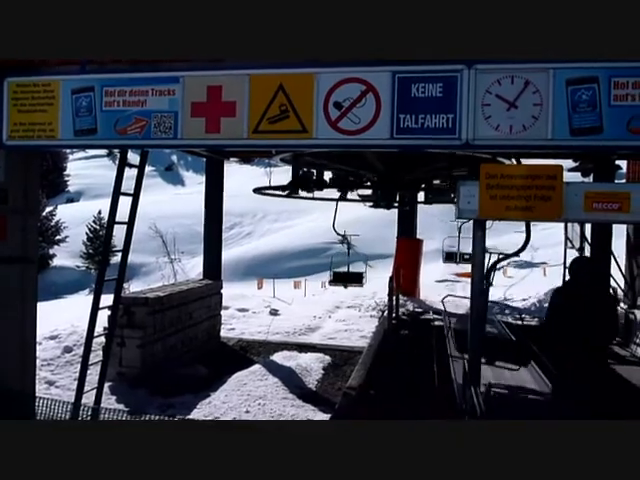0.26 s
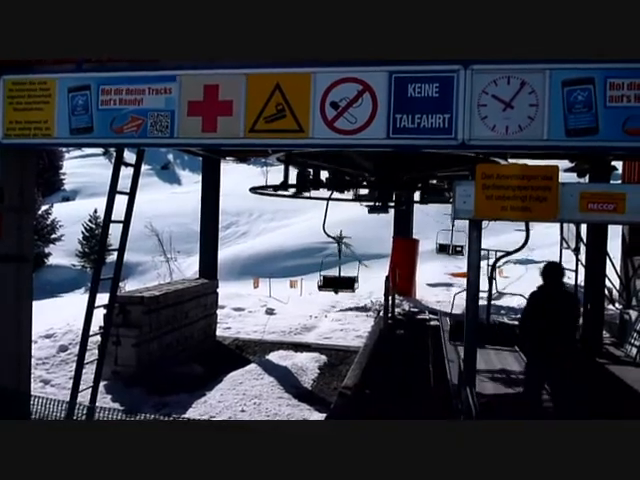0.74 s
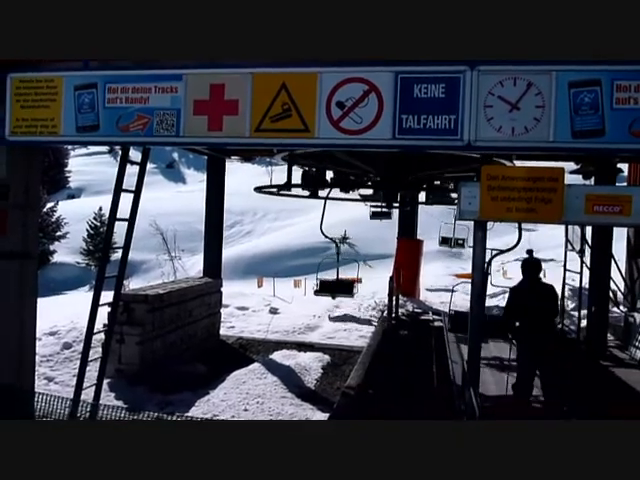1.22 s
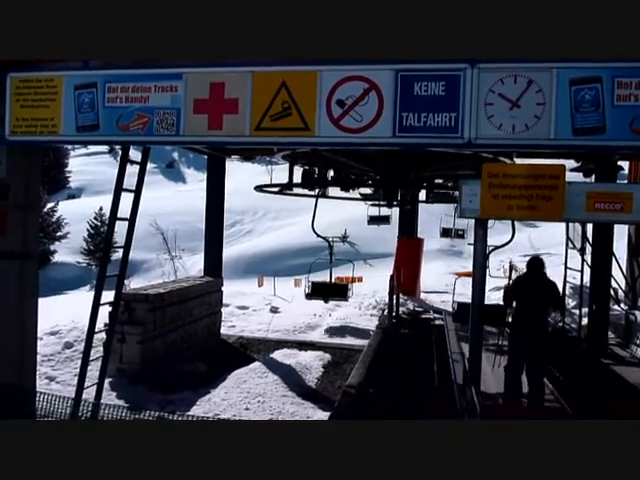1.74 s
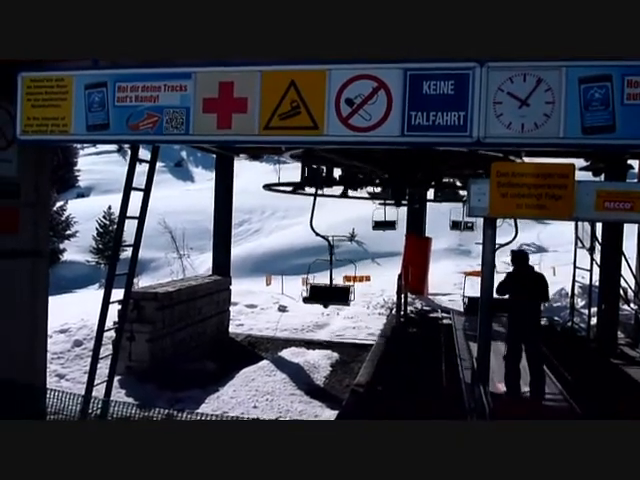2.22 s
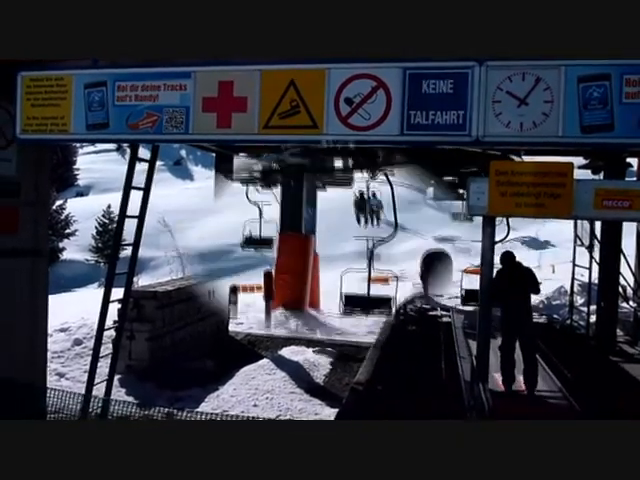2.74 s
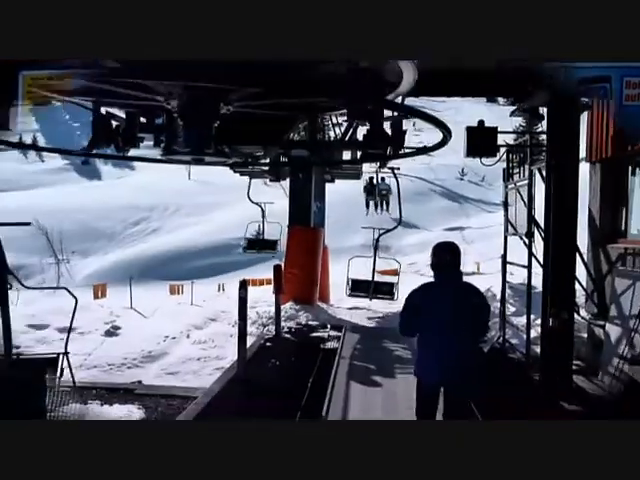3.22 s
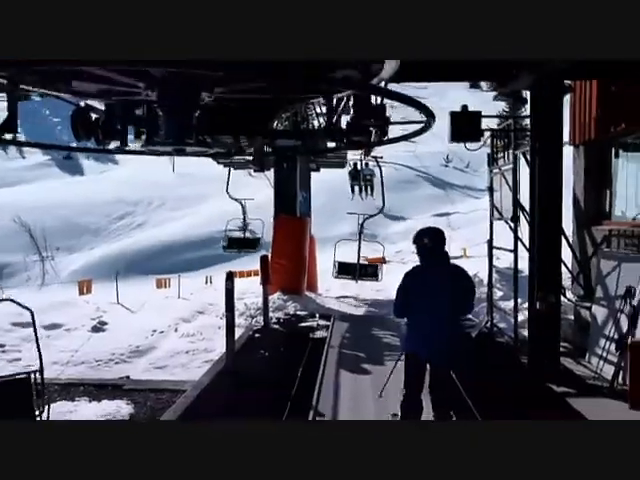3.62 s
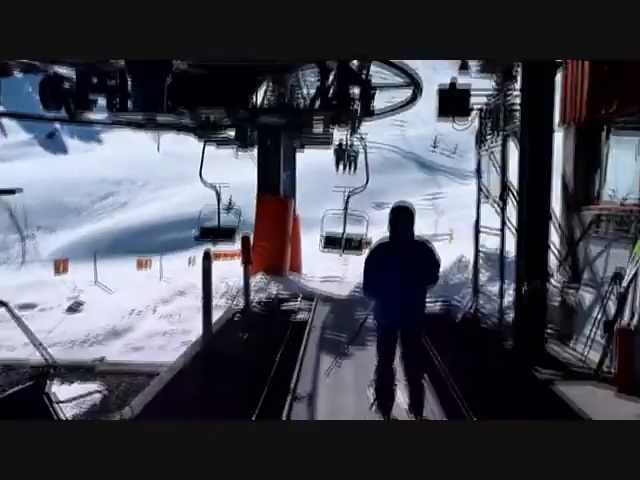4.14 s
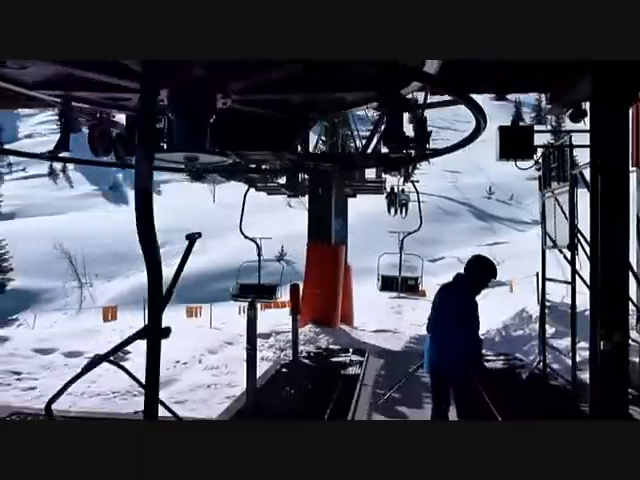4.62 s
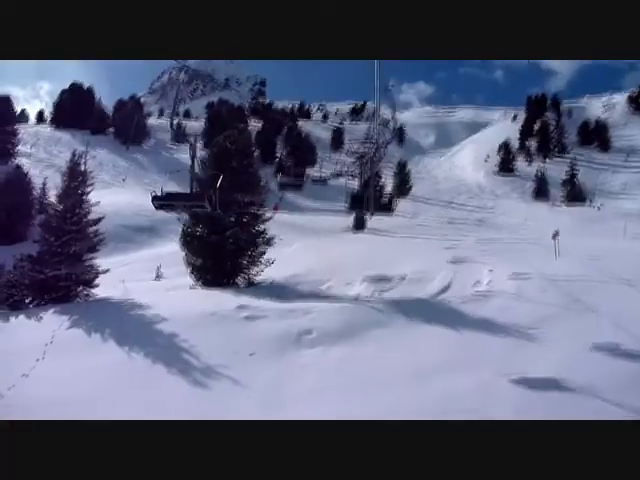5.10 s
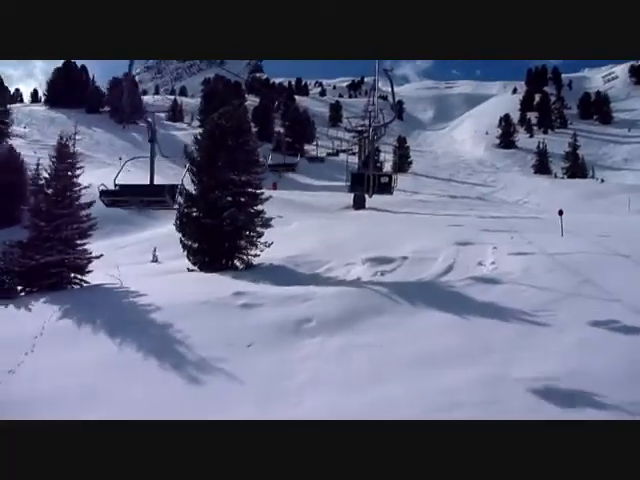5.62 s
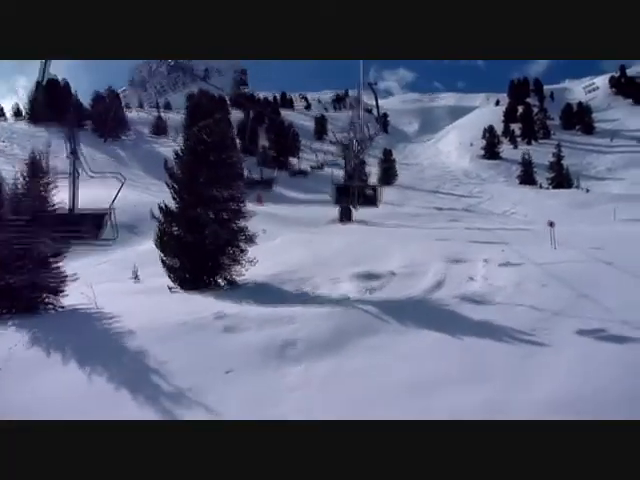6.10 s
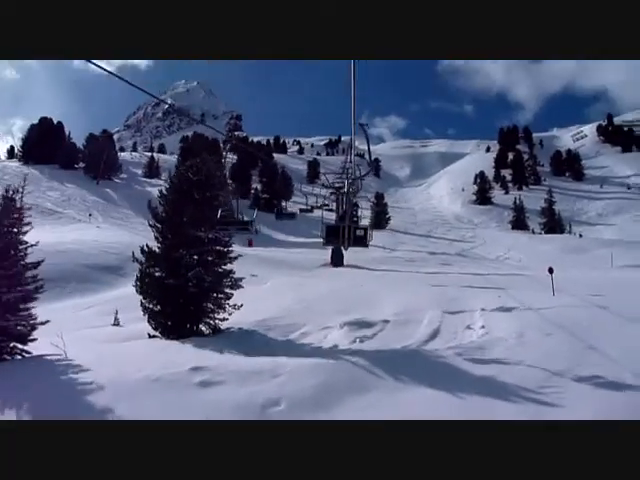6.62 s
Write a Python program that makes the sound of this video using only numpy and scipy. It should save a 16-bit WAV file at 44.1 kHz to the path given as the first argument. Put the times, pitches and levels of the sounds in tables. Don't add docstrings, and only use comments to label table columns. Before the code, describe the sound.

For the first five seconds a chairlift drive station runs steadily: a fluttering mid-pitched gear whine with overtones, fan and electrical hum, a ringing wheel and broad roar. At 1.0-1.5 s skis scrape in a grainy hiss; at 1.9 s two bright pole clicks snap close together. From 2.8 to 3.4 s the sound crossfades to a position under the wheel, changing tone and becoming closer and fuller by 4 s, with a low roller groan. A hard metallic clack with rattling follows at 4.2 s. At about 4.96 s it cuts with a click, a tiny gap, then a far quieter slope: soft wind, faint rope hum and distant whine, cloth rustle, tiny ticks. A loose bar knocks lightly at 5.6 and 5.9 s, then louder with bounces at 6.2, 6.5 and 6.8 s. The small microphone gives a dull top and thin bass.

```python
import sys
import numpy as np
from scipy import signal
from scipy.fft import rfft, irfft, next_fast_len
from scipy.io import wavfile
from scipy.ndimage import uniform_filter1d

SR = 44100
rng = np.random.default_rng(int(sys.argv[2]) if len(sys.argv) > 2 else 0)


def unload_wav(signal):
    wavfile.write(
        sys.argv[1],
        SR,
        np.round(np.clip(np.atleast_2d(signal).T, -1, 1) * 32767).astype(np.int16),
    )


def level_to_linear(level):
    exponent = np.asarray(level, float) / 20
    return 10 ** exponent


N = 302526
T = np.arange(N) / SR
MESH_HZ = 677.3
CUT_S, TAIL_S, START_S = 4.9587, 4.984, 4.9972
BLOW_S = .08

# f/Hz, level/dB per Hz
SLIDE_SPECTRUM = [(500, -30), (900, -4), (1600, 0), (2500, 0.5), (3300, 2), (4500, 0), (5500, -4.5),
                  (6800, -10.5), (8000, -24.5), (10000, -68.5)]


def unit(x):
    return x / np.sqrt(np.mean(x ** 2))


def walk(rate_hz):
    k = 8
    steps = np.repeat(rng.standard_normal(int(T[-1] * rate_hz) + 2), k)
    smooth = unit(uniform_filter1d(uniform_filter1d(steps, k), k))
    return np.interp(T * rate_hz * k, np.arange(len(smooth)), smooth)


def swells(rows):
    total = 0
    for s, rise_s, fall_s, height in rows:
        times = s - max(rise_s, .005), s, s + max(fall_s, .005)
        total = total + height * np.sin(np.pi / 2 * np.interp(T, times, (0, 1, 0))) ** 2
    return total


def shifts(rows, order):
    return swells([(s, half_s, half_s, db) for s, half_s, m, db in rows if round(m) == order])


def colour(x, points, flicker_db, rate_hz):
    size = next_fast_len(N, True)
    octave = np.log2(np.fft.rfftfreq(size, 1 / SR) + 1)
    hz, db = np.array(points).T
    spec = rfft(x, size) * level_to_linear(np.interp(octave, np.log2(hz), db))
    total = 0
    for centre in range(4, 15):
        band = irfft(spec * np.clip(1 - abs(octave - centre), 0, 1), size)[:N]
        total = total + band * level_to_linear(flicker_db * walk(rate_hz))
    return unit(total)


def tones(lines, fading_db, rate_hz):
    total = 0
    for (hz, db, *start), turn in zip(lines, rng.random(len(lines))):
        level = 2 ** .5 * level_to_linear(db + fading_db * walk(rate_hz))
        total = total + level * np.sin(2 * np.pi * (hz * T + (start or [turn])[0]))
    return total


def ring(hz, t60_s):
    t = T[:int(SR * BLOW_S)]
    return np.sin(2 * np.pi * hz * t) * 1000. ** (-t / t60_s)


def crack(lo_hz, hi_hz, t60_s):
    t = T[:int(SR * BLOW_S)]
    band = signal.butter(2, [lo_hz, min(hi_hz, .4 * SR)], "band", fs=SR, output="sos")
    noise = unit(signal.sosfilt(band, rng.standard_normal(len(t))))
    return 0.39 * noise * 1000. ** (-t / max(t60_s, .003)) * (1 - t / t[-1])


def add(out, s, sound):
    i = int(s * SR)
    out[i:i + len(sound)] += sound[:N - i]


def clicks(rows):
    out = np.zeros(N)
    for s, db, hz, t60_s, octaves in rows:
        wide = 2 ** np.clip(octaves, .05, 2)
        blow = .5 * ring(hz, max(t60_s, .003)) + crack(hz / wide, hz * wide, t60_s)
        add(out, s + 0.00061, level_to_linear(db) * blow)
    return out


def gears(near, close_db):
    far_db, near_db = (-35, -37, -33.5, -55), (-41, -40.5, -37.5, -53)
    flutter_db, flutter_hz = (0.4, 0.7, 1.0, 1.0), (14, 18, 22, 12)
    wander_rad, jitter_rad, rough_db = .2, .07, .45
    # beat f/Hz, share, start/rad
    beats = [(3.3, 0.12, 3.55), (2.5, 0.07, 0.34), (5.5, 0.13, 3.1), (4.4, 0.39, 0.59)]
    # t/s, rise/s, fall/s, shift/Hz
    loads = [
        (0.42, 0.12, 0.13, 1.07),
        (1.25, 0.218, 0.213, -3),
    ]
    # t/s, half length/s, multiple, level/dB
    multiple_shifts = [(0.312, 0.098, 1, 4), (0.448, 0.088, 1, -4.5), (0.982, 0.099, 1, 4.5), (1.13, 0.17, 1, -2),
                       (2.367, 0.12, 1, -5.5), (3.117, 0.61, 1, -9), (3.465, 0.083, 1, 6), (3.697, 0.17, 1, -1.5),
                       (4.03, 0.23, 1, 2), (4.217, 0.038, 1, -27), (4.452, 0.15, 1, -16), (4.758, 0.21, 1, 3),
                       (0.443, 0.047, 2, 3.5), (0.876, 0.1, 2, -5), (1.247, 0.17, 2, -5.5), (2.998, 0.11, 2, -14),
                       (3.314, 0.28, 2, 4.5), (3.77, 0.075, 2, -13), (3.95, 0.077, 2, 6.5), (4.213, 0.32, 2, -6.5),
                       (4.683, 0.16, 2, -12.5), (0.205, 0.15, 3, -5.5), (1.788, 0.094, 3, 4.5),
                       (1.064, 0.081, 3, 5.5), (2.647, 0.11, 3, -12), (3.033, 0.31, 3, -5.5), (3.696, 0.039, 3, 9),
                       (4.265, 0.055, 3, -29), (4.787, 0.18, 3, 4), (4.033, 0.036, 4, 8), (.6, .1, 1, 2),
                       (1.11, .05, 1, -3), (1.8, .1, 1, 3), (3.65, .05, 1, -4), (4.9, .05, 1, -4),
                       (2.52, .08, 1, -3), (4.87, .07, 2, 4), (1.07, .1, 3, 2), (1.47, .12, 3, -3),
                       (4.17, .08, 2, -3), (1.55, .08, 2, -4), (1.65, .03, 2, -7), (4.04, .06, 2, 5),
                       (4.42, .08, 2, -5), (.24, .03, 3, -6), (1.93, .03, 3, -5), (2.3, .15, 3, 1.5),
                       (2.72, .04, 3, 2), (2.93, .06, 3, 4), (3.8, .07, 3, 5), (3.39, .03, 3, -5),
                       (1.087, 0.033, 1, -7.0), (1.197, 0.12, 1, 3.5), (1.696, 0.068, 1, -3.5),
                 (2.877, 0.11, 1, 3), (3.367, 0.047, 1, -10), (3.587, 0.085, 1, -2), (3.697, 0.04, 1, 2),
                 (3.741, 0.049, 1, -11), (3.78, 0.031, 1, 2), (3.87, 0.048, 1, 4.5), (3.958, 0.075, 1, 0),
                 (4.055, 0.088, 1, 3.5), (4.37, 0.055, 1, -9), (4.704, 0.072, 1, -1), (0.176, 0.036, 2, -8),
                 (0.28, 0.055, 2, -4), (0.913, 0.085, 2, 2.5), (1.053, 0.051, 2, 5), (1.187, 0.036, 2, 2),
                 (1.236, 0.04, 2, 7), (1.742, 0.14, 2, 2), (2.138, 0.082, 2, -2.5), (2.265, 0.088, 2, 1),
                 (2.803, 0.064, 2, -7), (3.036, 0.04, 2, 5), (3.088, 0.053, 2, -7), (3.593, 0.091, 2, 5),
                 (3.722, 0.062, 2, -2), (4.769, 0.04, 2, -6), (0.71, 0.12, 3, -5.5), (0.826, 0.033, 3, 2),
                 (1.426, 0.33, 3, 0), (1.616, 0.12, 3, 3), (1.701, 0.078, 3, -5), (1.97, 0.13, 3, -5.5),
                 (2.21, 0.039, 3, 2), (2.42, 0.039, 3, -9), (2.722, 0.029, 3, 4), (2.844, 0.057, 3, 3),
                 (3.06, 0.03, 3, 5), (3.12, 0.065, 3, -8), (3.426, 0.12, 3, -5), (3.933, 0.12, 3, 1.5),
                 (4.07, 0.13, 3, -10), (4.397, 0.041, 3, -14), (4.486, 0.046, 3, 7), (4.563, 0.04, 3, 2.5),
                 (4.604, 0.04, 3, -11), (4.768, 0.055, 3, -1.5)]
    levels_db = []
    for i, (beat_hz, share, start_rad) in enumerate(beats):
        db = far_db[i] + (near_db[i] - far_db[i]) * near + close_db
        db = db + flutter_db[i] * walk(flutter_hz[i]) + shifts(multiple_shifts, i + 1)
        beat_rad = 2 * np.pi * beat_hz * T + start_rad + .3 * walk(5.4)
        levels_db.append(db + 20 * np.log10(abs(1 + np.clip(share, 0, .8) * np.exp(1j * beat_rad))))
    turn_rad = 2 * np.pi * (MESH_HZ * T + np.cumsum(swells(loads)) / SR) + wander_rad * walk(8)
    rough = 1 + 1.3 * near
    whine = level_to_linear(levels_db[3] - 3.5) * np.sin(5 * turn_rad)
    for k, db in enumerate(levels_db, 1):
        level = level_to_linear(db + 2.0 + rough * k * rough_db * walk(45))
        whine = whine + level * np.sin(k * turn_rad + rough * k * jitter_rad * walk(35))
    return 2 ** .5 * whine


def fan(near):
    # order, level/dB
    far_orders = [(5, -50.5), (6, -54), (8, -39.5), (9, -42), (10, -40), (11, -47), (4, -57)]
    near_orders = [(5, -43), (6, -52), (8, -39), (9, -56), (10, -37.5), (11, -56.5), (4, -51)]
    # t/s, half length/s, order, level/dB
    order_shifts = [(0.3, 0.29, 8, 3.5), (.75, 0.15, 8, 5), (.1, 0.27, 10, 1.5), (0.97, .25, 9, 4.5),
                    (3.27, .2, 8, -9), (2.9, .2, 8, 4), (3.75, 0.49, 8, 7), (5, .25, 8, -5.5),
                    (3.85, 0.35, 10, -13), (4.4, .3, 10, 4.5), (4.1, 0.087, 10, -8.5), (4.55, 0.45, 9, 7),
                    (0.68, 0.43, 5, 5.5), (4.9, 0.16, 5, 8.5), (4.4, 0.11, 11, 9.5), (1.8, .12, 11, -9),
                    (3, .3, 11, -8), (4.66, .18, 9, 9), (2.4, .1, 9, 6), (3.48, .2, 10, 3.5)]
    fan_hz = 45.45

    def blades(orders):
        lines = [(k * fan_hz, db + shifts(order_shifts, k), k % 2 / 4) for k, db in orders]
        return unit(tones(lines, .8, 7))

    mix = level_to_linear(-34.5) * (1 - near) * blades(far_orders) + level_to_linear(-39.5) * near * blades(near_orders)
    return level_to_linear(-1.5 * near) * mix


def mains(near, close_db):
    mains_hz = 300.2
    hum = tones([(mains_hz, -46.5), (3 * mains_hz, -58), (703.5, -50)], 1.5, 5.2)
    second_db = -19 + swells([(3.1, .35, .08, 12), (5.6, 0.17, .1, 10), (3.6, 0.39, .15, -15), (3.7, .1, .1, 5)])
    casing = tones([(2 * mains_hz, second_db), (4 * mains_hz, -26)], 1.5, 5.9)
    return level_to_linear(-4 * near) * hum + near * level_to_linear(-32.5 + close_db) * casing


def pump(near):
    return level_to_linear(-5 * near) * tones([(371.87, -47, .17)], 0.62, 3.4)


def wheel(near, close_db):
    # f/Hz, level/dB
    far_lines = [(1408, -55), (1430, -54), (1452, -55), (1475, -52), (1497, -54), (1518, -48), (1561, -57),
                 (1583, -55), (1604, -51), (1647, -50), (1712, -50), (1782, -51), (1803, -46), (1825, -45),
                 (1846, -54), (1868, -55), (1911, -54), (1933, -54), (1999, -51), (2065, -52), (2086, -53)]
    near_lines = [(1408, -61), (1432, -51), (1453, -47), (1475, -56), (1518, -54), (1540, -49), (1561, -54),
                  (1583, -52), (1604, -52), (1626, -52), (1650, -57), (1674, -52), (1690, -49), (1712, -53),
                  (1739, -52), (1758, -52), (1782, -49), (1803, -56), (1825, -55), (1846, -49), (1868, -55),
                  (1890, -56), (1911, -55), (1933, -54), (1955, -53), (1976, -50), (1999, -50), (2065, -51),
                  (2086, -49), (2108, -58), (2129, -57)]
    shaft_hz = MESH_HZ / 62

    def odd_orders(lines):
        return [(shaft_hz * (2 * np.round((hz / shaft_hz - 1) / 2) + 1), db) for hz, db in lines]

    far = level_to_linear(-0.17) * tones(odd_orders(far_lines), 2, 4)
    under = level_to_linear(-1.0) * tones(odd_orders(near_lines), 2.8, 4.5)
    band = signal.butter(3, [1380, 2120], "band", fs=SR, output="sos")
    hiss = unit(signal.sosfilt(band, rng.standard_normal(N)))
    return level_to_linear(close_db) * (far * (1 - near) + under * near + level_to_linear(-43.5) * hiss)


def roar(close_db, slide_db):
    # f/Hz, level/dB per Hz
    roar_spectrum = [(150, -36), (220, -5.5), (450, 0.5), (700, -2.5), (1000, -8), (1500, -8),
                     (2200, -11.5), (3500, -13.5), (5300, -16), (6800, -26.5), (8000, -35.5),
                     (10000, -82.5)]
    # peak/s, rise/s, fall/s, level/dB
    rushes = [
        (0.59, 0.048, .05, 3.5),
        (1.04, 0.13, 0.19, 5),
        (1.3, 0.44, .3, -1.5),
        (4.29, 0.067, .05, 4.5),
        (4.39, 0.05, 0.055, 4.5),
        (.87, 0.059, .06, -3.5),
        (2.85, 0.22, 0.32, -2),
        (3.8, 0.33, .3, -1.5),
    ]
    level_db = -36.5 + 0.59 * close_db + 0.16 * slide_db + swells(rushes)
    return level_to_linear(level_db) * colour(rng.standard_normal(N), roar_spectrum, 1.0, 9)


def rumble(near):
    # f/Hz, level/dB per Hz
    rumble_spectrum = [(18, -82), (30, -50), (75, -46), (108, -19 ), (140, -9), (216, -4.5), (240, -16),
                       (310, -33), (530, -120)]
    level_db = -59 - 11 * near * (1 - near) - 0.67 * near
    noise = colour(rng.standard_normal(N), rumble_spectrum, 0.47, 16)
    shafts = tones([(90.9, -14.5), (118.65, 2.5 - 5 * near)], .5, 1.1)
    return level_to_linear(level_db) * (level_to_linear(10.0) * noise + shafts)


def skis(slide_db):
    grains = rng.standard_normal(N) * level_to_linear(1.2 * walk(600))
    return level_to_linear(-43.5 + slide_db) * colour(grains, SLIDE_SPECTRUM, .8, 14)


def poles_and_grip():
    # t/s, peak level/dB, centre f/Hz, t60/s, half width/octaves
    pole_clicks = [(.57, -25.5, 4050, .015, 0.86), (1.873, -26, 4600, 0.015, 0.52),
                   (1.8872, -13, 6100, 0.0062, 0.08), (1.8877, -14, 4440, 0.0096, 0.078),
                   (1.8876, -17, 3470, 0.009, .12), (1.9333, -13, 6200, 0.005, 0.25),
                   (1.9332, -15, 4560, .007, 0.21), (1.9333, -14, 3300, 0.0077, 0.3),
                   (3.169, -26, 3280, .015, 0.85), (3.4275, -32.5, 7350, .012, .1),
                   (3.4293, -24, 5000, .01, .2), (1.913, -33, 4960, .02, .3),
                   (1.919, -31, 5030, 0.056, 0.39), (1.925, -29, 5600, 0.046, 0.41),
                   (4.2048, -10, 2880, .015, .2), (4.2055, -21, 4340, .07, 0.1),
                   (4.2108, -21, 4700, .04, 0.15), (4.2167, -21, 4900, .03, 0.12),
                   (4.2266, -20, 3180, 0.027, 0.15), (4.2335, -20, 4340, 0.06, 0.15),
                   (4.253, -27, 4500, .04, .2), (4.273, -34, 4300, .03, 0.19),
                   (4.3006, -21, 3260, 0.037, .4), (4.312, -31, 4330, .05, 0.15),
                   (4.321, -21, 3400, .02, .3), (4.28, -27, 348, 0.27, 0.092), (4.2795, -15, 2100, .03, .2)]
    out = clicks(pole_clicks)
    add(out, 4.2052, level_to_linear(-19.5) * crack(2700, 5300, .4))
    return out


def roller(near):
    # peak/s, rise/s, fall/s, level/dB
    groans = [
        (3.42, .25, 0.42, 11.5),
        (3.9, 0.63, 0.55, 19.5),
        (4.4, 0.099, 0.086, 17.5),
        (4.67, 0.18, 0.14, 13.5),
    ]
    return np.sqrt(near) * level_to_linear(-54 + swells(groans)) * tones([(323.4, 0)], .8, 9)


def station():
    # t/s, level/dB
    closeness = [(0.0, 1), (1.0, 0.5), (1.6, -0.8), (2.6, 0.5), (2.95, -1), (3.3, 1.8), (3.65, 3),
                 (3.95, 7.5), (4.3, 7), (4.55, 6), (4.96, 5)]
    # peak/s, rise/s, fall/s, level/dB
    pushes = [(0.95, .5, 0.091, 2.5), (1.04, 0.13, 0.24, 8.5), (1.18, 0.085, 0.25, 13),
              (1.42, 0.28, 0.26, 13), (1.9, 0.18, 0.11, 3), (2.75, .1, 0.14, 4), (3.82, 0.25, 0.58, 8),
              (3.76, .04, 0.06, 2.5), (3.99, .1, .08, 4), (1.24, 0.042, 0.074, 2.5),
              (4.68, .15, 0.066, 3.5)]
    near = np.interp(T, (2.8, 3.44), (0, 1))
    close_db = np.interp(T, *np.transpose(closeness))
    slide_db = swells(pushes)
    drive = gears(near, close_db - .25 * slide_db)
    drive = drive + fan(near) + mains(near, close_db) + pump(near) + wheel(near, close_db)
    drive = drive + roar(close_db, slide_db) + rumble(near) + roller(near)
    return drive + skis(slide_db) + poles_and_grip()


def mountain_air():
    # f/Hz, level/dB per Hz
    air_spectrum = [(18, -83), (30, -53), (150, -6), (199, -11), (290, -6), (333, -11), (507, -10),
                    (889, -13.5), (976, -15), (1390, -16), (1520, -20), (2060, -19), (8000, -35),
                    (10400, -82), (17600, -120)]
    return level_to_linear(-45.5 - 0.7 * (T - START_S)) * colour(rng.standard_normal(N), air_spectrum, 0.72, 21)


def rope():
    # peak/s, rise/s, fall/s, level/dB
    hum_swells = [
        (5.52, 0.2, 0.3, 13),
        (4.6, .1, .15, 11),
        (6.5, .25, .2, 12),
        (6.6, .35, .5, -10),
    ]
    whine_swells = [
        (5.35, .25, .1, 1),
        (5.58, 0.16, 0.12, -11),
        (6.0, 0.28, 0.46, 5),
    ]
    far_mesh_hz = 674.8
    hum = level_to_linear(-62.5 + swells(hum_swells)) * tones([(149.7, -2.5)], 1.4, 8) + tones([(90.2, -67.0)], 0.89, 4)
    lines = [(far_mesh_hz, -5), (2 * far_mesh_hz, -.5), (3 * far_mesh_hz, -9)]
    return hum + level_to_linear(-58 + swells(whine_swells)) * tones(lines, 1.5, 8)


def rustle():
    # peak/s, rise/s, fall/s, level/dB
    rubs = [
        (5.0, 0.0092, .02, 6),
        (4.7, .015, .025, 6),
        (5.41, .015, .03, 3),
        (5.3, .04, 0.036, 1.5),
        (5.66, .03, 0.03, 4.5),
        (5.5, .1, 0.055, -2),
        (6.07, 0.064, 0.049, 6.5),
        (6.6, 0.076, 0.23, -8),
    ]
    grains = rng.standard_normal(N) * level_to_linear(2.6 * walk(150))
    return level_to_linear(-53 + swells(rubs)) * colour(grains, SLIDE_SPECTRUM, 1.3, 20)


def chair_ticks():
    # t/s, peak level/dB, centre f/Hz
    ticks = [(5.1108, -37, 2650), (5.16, -46, 3820), (5.2056, -42, 3670), (5.227, -37, 2200),
             (5.2644, -43, 2490), (5.3774, -40, 2360), (5.404, -41, 2320), (5.469, -38, 2140),
             (5.537, -41, 2000), (5.542, -33, 2100), (5.546, -43, 2250), (5.553, -40, 2150),
             (5.558, -41, 2060), (5.579, -44, 2000), (5.6471, -42, 4250), (5.655, -42, 4300),
             (5.668, -46, 3460), (6.0337, -39, 2230), (6.0526, -43, 4420), (6.0713, -43, 2360),
             (6.189, -37, 2200), (6.2704, -41, 2170), (6.365, -35, 2980), (6.4154, -45, 2110),
             (6.4313, -38, 2260), (6.537, -40, 4400),
             (5.0044, -48, 3910), (5.0932, -51, 3900), (5.1111, -39, 4380), (5.128, -38, 2200),
                 (5.176, -52, 3900), (5.2269, -41, 4340), (5.242, -47.5, 4400), (5.294, -44, 3300),
                 (5.365, -48, 4090), (5.4045, -45, 5040), (5.415, -47, 4300), (5.5237, -50, 3450),
                 (6.0336, -44, 4270), (6.072, -45, 4100), (6.1877, -43, 4460), (6.4297, -47, 4550),
                 (6.6432, -49, 3990)]
    t60_s, octaves = 0.046, 0.17
    snap = 5.7132, -21, 5600, .007, .18
    return clicks([(*tick, t60_s, octaves) for tick in ticks] + [snap])


def bar():
    # t/s, peak level/dB, low modes/dB
    knocks = [(5.6153, -21.5, -12), (5.6294, -39, -6), (5.8833, -17, -16), (5.9001, -20, -8),
              (5.9084, -29, -13), (6.2139, -8.5, -14), (6.2254, -11.5, -16), (6.234, -30, -17),
              (6.4852, -10, -15), (6.4967, -13.5, -18), (6.7724, -10.5, -19), (6.781, -33.5, -25),
              (6.7841, -10, -29), (6.7924, -30, -21)]
    # f/Hz, level/dB, t60/s
    bar_modes = [(1020, -27, 0.034), (1290, -11, 0.064), (1640, -4.5, 0.063), (2310, -2, 0.044),
                 (3400, -19, .025), (4300, 9, 0.11), (5100, -6, 0.018), (5080, 2.5, 0.043),
                 (5500, -16, 0.023), (5900, -15, .02), (6320, -26, 0.015), (7360, -17, .02)]
    free_s, settle_s = 0.0041, 0.0009
    out = np.zeros(N)
    t = T[:int(SR * BLOW_S)]
    after_s = np.clip(t - free_s, 0, 1)
    seated = level_to_linear(-10 * np.clip(after_s / settle_s, 0, 1) - 900 * after_s)
    for s, db, low_db in knocks:
        modes = 0
        for hz, mode_db, t60_s in bar_modes:
            a, b = rng.standard_normal(2)
            level = level_to_linear(mode_db + 1.1 * a + (low_db + 25.0) * (hz < 3000))
            modes = modes + level * ring(hz * (1 + 0.0076 * b), t60_s)
        snap = 1.1 * ring(4700, .006) + .4 * ring(6900, .005)
        rattle = level_to_linear(-2.5) * crack(3450, 6600, 0.027) + level_to_linear(-7.5) * crack(920, 4200, 0.072)
        add(out, s + 0.00085, level_to_linear(db - 5.0) * (seated * modes / abs(modes).max() + snap + rattle))
    return signal.sosfilt(signal.butter(3, 900, "high", fs=SR, output="sos"), out)


def ride():
    return mountain_air() + rope() + rustle() + chair_ticks() + bar()


def scene():
    return np.where(T < (TAIL_S + START_S) / 2, station(), ride())[None]


def blips(x):
    blip_s, share_on = .07, 0.51
    step = (T / blip_s).astype(int)
    pick, on = rng.random((2, int(T[-1] / .05) + 1))
    hz = np.where(pick < .3, 7880 + 200 * pick, 8140 + 300 * pick)[step]
    gate = (on < share_on)[step] * np.sin(np.pi * T / blip_s) ** 2
    level = np.sqrt(abs(uniform_filter1d(x ** 2, 8000)))
    return level_to_linear(-54) * level * gate * np.sin(2 * np.pi * hz * T)


def top_cut(x):
    return signal.sosfilt(signal.butter(12, 15800, fs=SR, output="sos"), x)


def record(dry):
    lead = 2000
    x = .3 * np.tanh(np.pad(dry, ((0, 0), (lead, 0)), "reflect") / .3)
    x = signal.lfilter(*signal.iirnotch(2890, 9, fs=SR), x)
    x = signal.sosfilt(signal.ellip(8, .3, 70, 7650, fs=SR, output="sos"), x)
    x = signal.sosfilt(signal.ellip(6, .5, 20, 7790, fs=SR, output="sos"), x)[:, lead:]
    x = signal.sosfilt(signal.butter(2, 70, "high", fs=SR, output="sos"), x)
    spill = signal.sosfilt(signal.butter(3, [7900, 8800], "band", fs=SR, output="sos"), x ** 3 * 10)
    x = x + blips(x[0]) + level_to_linear(-19) * spill
    last = (T > CUT_S - .0003) & (T < CUT_S)
    first = (T > START_S) & (T < START_S + .0008)
    stop_s = T[np.argmax(abs(x[0]) * last)]
    start_s = T[np.argmax(abs(x[0]) * first)]
    leftover = level_to_linear(np.interp(T, (TAIL_S - .003, TAIL_S), (-33, -70)))
    edit = np.select([T <= stop_s, T < TAIL_S, T < start_s], [1, leftover, level_to_linear(-79)], 1)
    opening = np.clip(T / .00015, 0, 1)
    return top_cut(x * edit * opening)


dry = scene()
out = record(dry)
unload_wav(out)
```